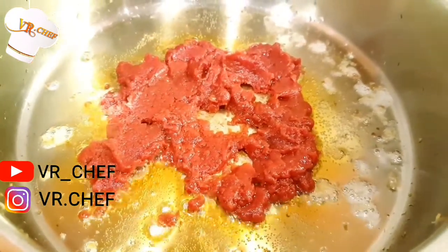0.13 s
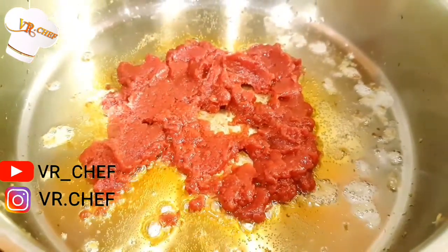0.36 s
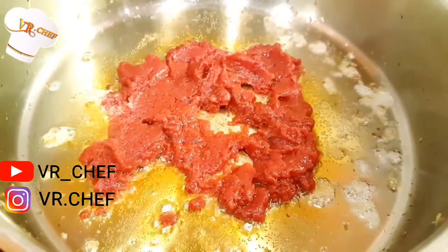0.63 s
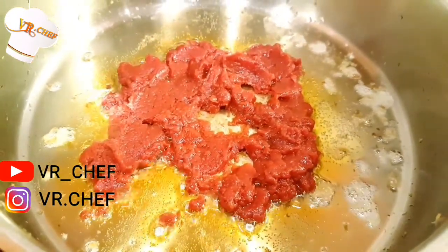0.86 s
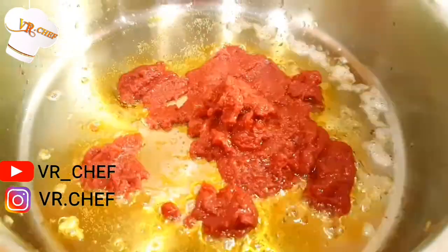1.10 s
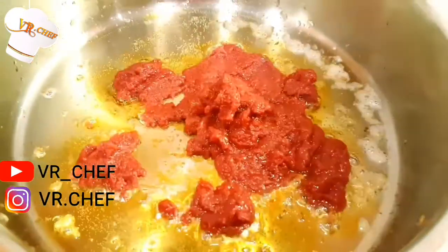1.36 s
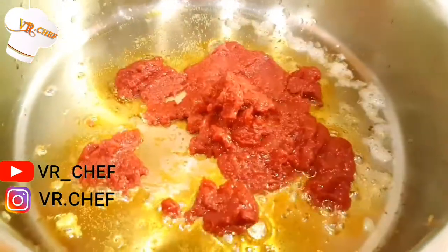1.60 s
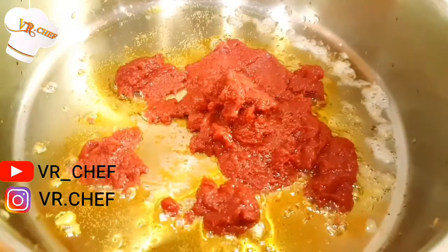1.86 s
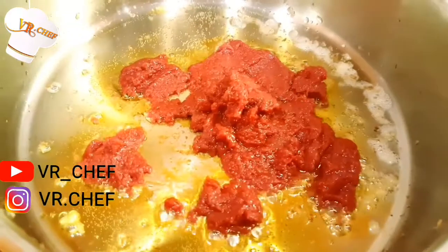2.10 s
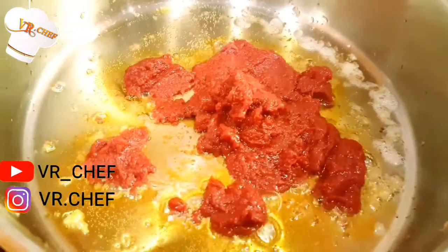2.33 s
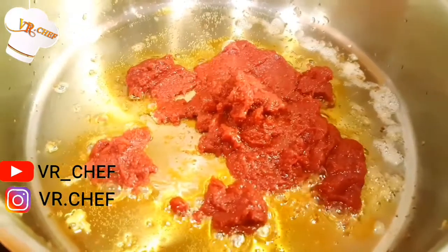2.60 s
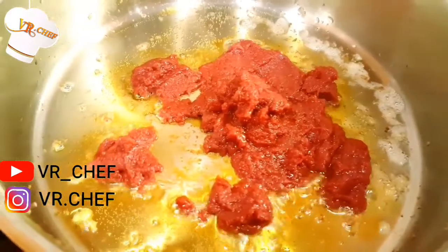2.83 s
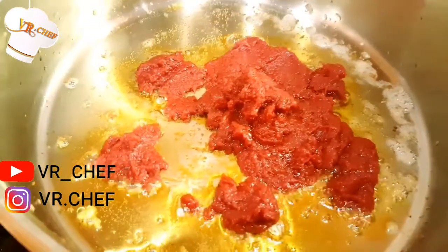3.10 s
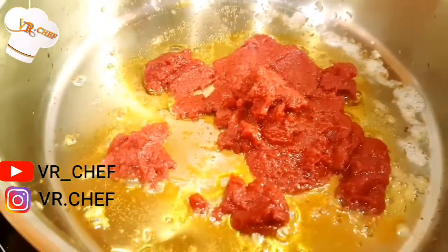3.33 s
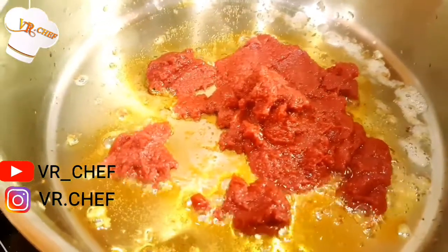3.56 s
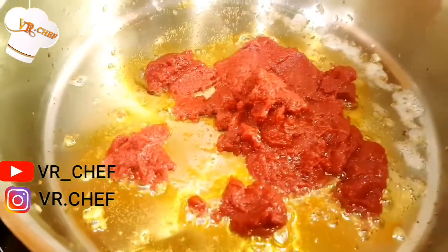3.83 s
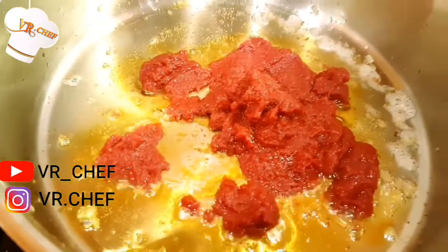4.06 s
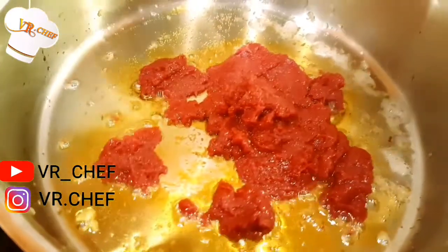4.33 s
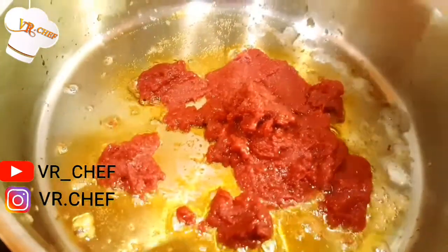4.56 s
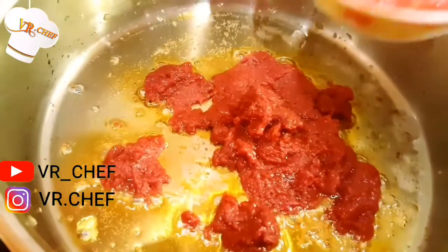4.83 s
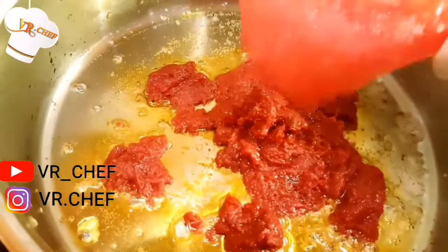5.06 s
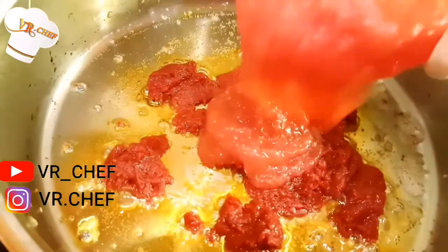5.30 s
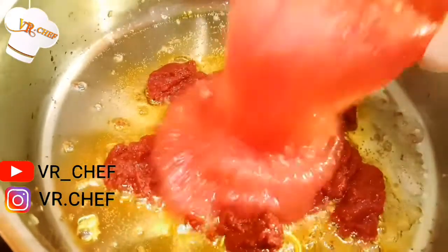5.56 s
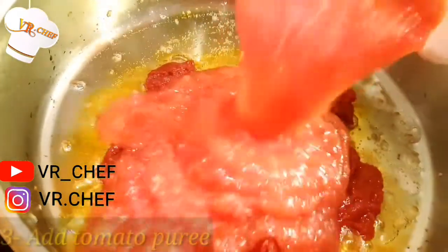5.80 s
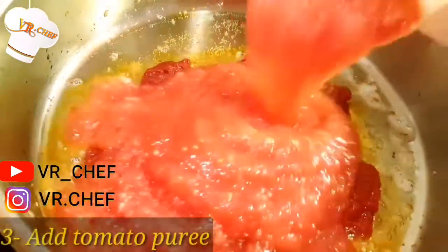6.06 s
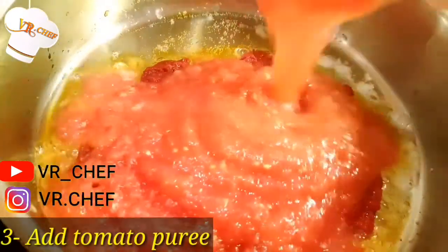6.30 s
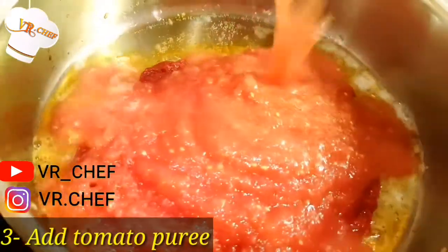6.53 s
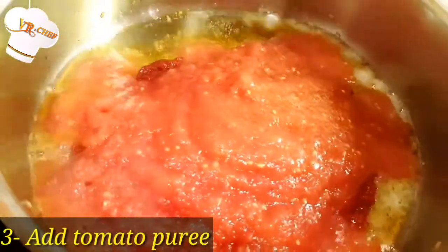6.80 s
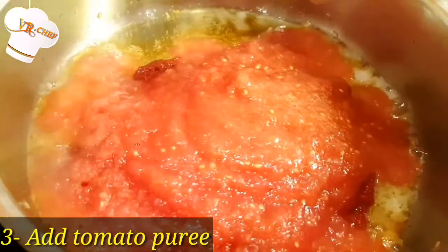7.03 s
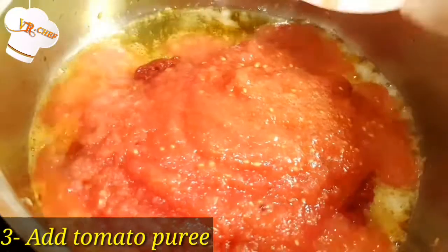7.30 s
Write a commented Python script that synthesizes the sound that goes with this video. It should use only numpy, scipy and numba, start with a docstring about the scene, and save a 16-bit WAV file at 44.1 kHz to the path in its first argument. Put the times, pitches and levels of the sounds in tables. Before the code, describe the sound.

Close to a steel pan in a kitchen, tomato paste fries in hot oil: sparse sharp pops and wet snaps, thickening gradually over faint fizz and a steady extractor fan rumble. A soft knock sounds twice early on. Then poured puree makes the sizzle surge quickly into a loud, dense, bubbling roar that slightly overloads the microphone and holds to the end.

```python
"""An extractor fan rumbles and rushes (shaped noise, wavering tones) under a fine fizz of tiny bubble bursts.
Tomato paste fries in hot oil in a steel pan, left of centre: steam bubbles pop as short, swelling sines.
Each burst echoes off the pan wall and rings the pan. A thin hum comes and goes; a soft knock sounds twice.
Poured puree then flashes to a roar of dense bubbles that overloads the input."""
import sys
import numpy as np
from scipy import signal
from scipy.fft import rfft, irfft, next_fast_len
from scipy.io import wavfile
from scipy.ndimage import uniform_filter1d
from numba import njit

SR = 44100
rng = np.random.default_rng(int(sys.argv[2]) if len(sys.argv) > 2 else 0)


def boost(x):
    """Linear amplitude factor 10**(x/20) for a level x in decibels (scalar or array-like)."""
    u = np.asarray(x, float) / 20
    return 10 ** u


def materialize(psi):
    """Save the field psi as 16-bit PCM at rate SR to the path in sys.argv[1].

    A 1-D psi becomes a single channel; in a 2-D psi each row is a channel.
    """
    bounded = np.clip(np.atleast_2d(psi).T, -1, 1)
    quanta = np.round(bounded * 32767).astype(np.int16)
    wavfile.write(sys.argv[1], SR, quanta)


N = 326781
TIME = np.arange(N) / SR


def level(x, rms_db):
    """Set the rms."""
    return x * boost(rms_db) / np.sqrt(np.mean(x ** 2))


def on_log(points, hz):
    """Read (Hz, value) points on a log-frequency axis."""
    point_hz, value = np.transpose(points)
    return np.interp(np.log(np.maximum(hz, 1)), np.log(point_hz), value)


def colour(x, gain):
    """Weigh the spectrum by gain(Hz)."""
    size = next_fast_len(N)
    hz = np.arange(size // 2 + 1) * SR / size
    return irfft(rfft(x, size) * gain(hz), size)[..., :N]


def walk(rate_hz):
    """Smoothed random steps, spread near 1."""
    k = int(SR / rate_hz)
    steps = np.repeat(rng.standard_normal(N // k + 1), k)
    return 1.266 * uniform_filter1d(uniform_filter1d(steps, k), k)[:N]


def tone(hz, rms_db, waver_hz, waver_db):
    """A sine whose pitch and level wander around hz and rms_db."""
    phase = 2 * np.pi * np.cumsum(hz + waver_hz * walk(18)) / SR
    return np.sqrt(2) * np.sin(phase) * boost(rms_db + waver_db * walk(7.4))


# spectrum of the air rush: pitch_hz, density_db [relative, per Hz]
FAN_SPECTRUM = [(15, -41), (25, -21.5), (71, -2), (164, -5), (189, -13), (288, -12), (345, -18),
                (430, -13.5), (569, -28), (668, -13.5), (738, -29), (950, -7), (1090, -1.5), (1250, -9),
                (1430, -19), (3000, -43), (3900, -55), (6600, -120)]
# likeness of the rush at the two ports: pitch_hz, likeness [0-1]
FAN_LIKENESS = [(60, 1), (130, 0.9), (290, 0.73), (640, 0.5), (1410, 0.59), (3100, 0.9), (6820, 0.03),
                (15000, 0.02)]
# motor tones: pitch_hz, level_db [rms, before wander], start_s
FAN_TONES = [(47, -59, 0), (82.6, -49, 0), (161, -57.5, 0.5), (436, -59, 2), (143, -51, 3), (215, -65, 2),
             (290, -56, 3.0)]


def fan():
    """Air rush as mid/side noise, alike at both ports in the bass, with wavering motor tones."""
    def likeness(hz):
        return np.clip(on_log(FAN_LIKENESS, hz), 0, 1)

    mid, side = rng.standard_normal((2, N))
    mid = colour(mid, lambda f: boost(on_log(FAN_SPECTRUM, f)) * np.sqrt(1 + likeness(f)))
    side = colour(side, lambda f: boost(on_log(FAN_SPECTRUM, f)) * np.sqrt(1 - likeness(f)))
    rush = level(np.array([mid + side, mid - side]), -39.5) * boost(2.0 * walk(3.86))
    tones = 0
    for pitch_hz, level_db, start_s in FAN_TONES:
        fade_in = np.clip((TIME - start_s) / 0.12, 0, 1)
        tones = tones + tone(pitch_hz, level_db, waver_hz=2.646, waver_db=2.5) * fade_in
    left_right_db = np.array([[1], [-1]])
    return rush + tones * boost(left_right_db)


@njit
def add(out, start, size, hz, cycles):
    """Sines that swell and die within a few cycles, one row of arrivals (samples) for each bubble."""
    for g in range(len(hz)):
        fade = hz[g] / cycles[g] / SR
        turn = np.exp(2j * np.pi * hz[g] / SR - fade)
        for a in range(start.shape[1]):
            # e * fade makes the envelope peak equal size
            i, z = int(start[g, a]), size[g, a] * np.e * fade + 0j
            for k in range(i, min(i + int(8 / fade) + 2, len(out))):
                out[k] += (k - i + 1) * z.imag
                z *= turn


# pan wall echoes: delay_ms, level_db [before dulling], scatter_ms
WALL = [(1.6, -5, .12), (3.3, -14, .4), (5.0, -20, .8)]


def bursts(start_s, level_db, hz, cycles, left_over_right_db, place, lag_samples=(3, 11)):
    """Bubbles at scattered places: left hears each first; every place has its own wall echoes."""
    direct = (0.000041, 0.013, 0.00017)
    delay_ms, path_db, scatter_ms = np.transpose([direct] + WALL)
    # every path, direct too, loses 7 dB per octave above 2 kHz
    path_db = path_db - 7 * np.log2(np.maximum(hz, 2000) / 2000)[:, None]
    sign = np.sign(place[:, 9:] - .5)
    min_lag, max_lag = lag_samples
    lag = min_lag + (max_lag - min_lag) * place[:, :1]
    out = np.zeros((2, N))
    for c in range(2):
        # the second port sees nearly the same paths as the first
        offset = 2 * place[:, 1:5] - 1 + c * 0.6 * (2 * place[:, 5:9] - 1)
        path_ms = delay_ms + scatter_ms * offset
        start = start_s[:, None] * SR + path_ms * SR / 1000 + c * lag
        size = boost(level_db[:, None] + path_db + (1.0 - c) * left_over_right_db[:, None]) * sign
        add(out[c], np.maximum(start, 0), size, np.minimum(hz, .45 * SR), cycles + 0 * hz)
    return out


def swarm(count, spread_db, low_hz, high_hz, cycles):
    """Random small bubbles, most faint, a few loud, their level capped."""
    u = rng.random((count, 14))
    level_db = spread_db * np.minimum(-np.log(1 - u[:, 1]), 4)
    hz = low_hz * (high_hz / low_hz) ** u[:, 2]
    left_over_right_db = 8 * (u[:, 3] - .5)
    return bursts(u[:, 0] * N / SR, level_db, hz, cycles, left_over_right_db, u[:, 4:])


def ring(x, hz, width_hz):
    """A resonance, gain 1 at its centre."""
    return signal.lfilter(*signal.iirpeak(hz, hz / width_hz, fs=SR), x)


# steel pan modes: pitch_hz, width_hz, level_db [relative]
PAN_MODES = [(290, 40, -14), (361, 45, -10), (645, 50, -6), (765, 55, -9), (920, 40, -9), (1305, 45, -4),
             (1880, 110, 4), (2210, 60, 2), (2760, 60, -3), (3340, 120, -4), (3830, 130, -6),
             (4370, 60, -7), (4790, 80, -9)]


def pan(x, ring_db, tail_db=-16, tail_t60_s=0.058):
    """The steel rings at its modes; hob and walls return a short diffuse tail, different at each port."""
    modes = sum(boost(level_db + ring_db) * ring(x, hz, width_hz) for hz, width_hz, level_db in PAN_MODES)
    t = np.arange(6000) / SR
    decay = np.exp(-np.log(1000) * t / tail_t60_s) * (t > .002)
    tail = rng.standard_normal((2, len(t))) * decay
    tail = level(tail, tail_db - 10 * np.log10(len(t)))  # tail_db: summed energy
    return x + modes + signal.fftconvolve(x, tail, axes=1)[:, :N]


# weighting of the boil: pitch_hz, gain_db
BOIL_SPECTRUM = [(88, -26), (150, -25), (361, -2.5), (490, -20.5), (628, -8.5), (837, -5.5), (1320, -3.5),
                 (1540, 0.5), (1870, -15.5), (2050, -4.5), (3370, -5.5), (10400, -23), (14400, -31)]
# weighting of the fizz: pitch_hz, gain_db
FIZZ_SPECTRUM = [(1500, -35), (4000, 1), (7000, 3), (10500, -1.5), (13000, 2.5), (16000, -5)]
# boil loudness over time, with a step up near 1.2 s: time_s, gain_db
BOIL_LEVEL = [(0, -49), (1.1, -50.5), (1.3, -47), (3.0, -49), (3.8, -45.5), (5.2, -47), (5.33, -37),
              (5.47, -35), (5.6, -29), (5.65, -29), (5.7, -24), (5.84, -20.5), (5.88, -16), (6.3, -15),
              (7.1, -13), (7.41, -14)]
# level difference of the ports: pitch_hz, left_over_right_db
PORTS = [(60, -18), (110, 32), (200, -3), (380, 4), (700, 1.5), (1290, 3), (2380, 6.5), (4400, 7),
         (8120, 0.5), (15000, 0)]
FIZZ_GAIN_DB, FIZZ_DB_PER_S = -45.5, 0.66  # calm fizz, growing as the oil heats
# puree spreads over bare hot steel
FLASH_S, FLASH_ATTACK_S, FLASH_GAIN_DB, FLASH_DB_PER_S = 5.83, 0.063, -23.5, 5.5
PLOPS_RISE_S = 6.4
CRACKLE_DB_PER_S = 1.16  # grows as the oil heats


def frying():
    """Dense boil swells by its table, finer fizz flares at the flash; sparse crackle marks the calm."""
    boil = swarm(count=60000, spread_db=3.0, low_hz=8600, high_hz=15300, cycles=0.065)
    boil = colour(boil, lambda f: boost(on_log(BOIL_SPECTRUM, f)))
    # larger bubbles in the wet puree ring for several cycles
    plops = swarm(count=9000, spread_db=6.5, low_hz=1135, high_hz=4620, cycles=3.4)
    wet_share = np.clip((TIME - PLOPS_RISE_S) / .1, .12, 1)
    boil = level(boil, 0) + wet_share * level(plops, -9.5)
    boil = level(pan(boil, ring_db=7.0, tail_db=-10.5), 6.34)
    boil = boil * boost(np.interp(TIME, *np.transpose(BOIL_LEVEL))) * boost(.8 * walk(18))

    fizz = swarm(count=60000, spread_db=2.0, low_hz=8450, high_hz=14300, cycles=0.043)
    fizz = colour(fizz, lambda f: boost(on_log(FIZZ_SPECTRUM, f)))
    since_s = TIME - FLASH_S
    attack = np.clip(since_s / FLASH_ATTACK_S, 0, 1)
    calm_gain = boost(FIZZ_GAIN_DB + FIZZ_DB_PER_S * TIME)
    fizz_gain = calm_gain + attack * boost(FLASH_GAIN_DB + FLASH_DB_PER_S * since_s)
    fizz = level(fizz, 3) * fizz_gain * boost(.4 * walk(30))

    crackle = swarm(count=700, spread_db=2.5, low_hz=2600, high_hz=12000, cycles=0.4)
    crackle = level(pan(crackle, ring_db=-22), -50) * boost(CRACKLE_DB_PER_S * TIME)
    return colour(boil + fizz + crackle, lambda f: boost(np.outer([.5, -.5], on_log(PORTS, f))))


# big bursts: start_s, level_db [relative], radius_mm [main bubble], spit_db [relative], left_over_right_db
POPS = [(0.0944, -22, 1.12, -48, 10), (0.824, -20.5, 1.7, -44, 10.5), (0.9186, -26.5, 0.85, -44, 10),
        (1.1002, -23.5, 0.76, -43, 10), (1.234, -22, 2, -46, 8), (1.354, -17, 1.75, -33.5, 9),
        (1.43, -30.5, 0.72, -30, 12), (1.4365, -19.5, 0.85, -41, 10), (1.4603, -22.5, 1.2, -45, 8),
        (1.594, -35, .7, -23, 8), (1.6494, -27, 0.58, -22, 12), (1.8613, -30, 0.85, -24.5, 10),
        (1.88, -22, 2.1, -38, 8.5), (1.892, -28.5, .9, -53, 13), (2.012, -27.5, 1.2, -29, 11),
        (2.088, -40, .8, -36, 4), (2.132, -42, 0.74, -29, 4), (2.204, -13.5, 1.3, -17.5, 4),
        (2.229, -20.5, 0.94, -31, 6), (2.268, -24, 0.61, -21, 7), (2.3166, -28, 0.86, -45, 8),
        (2.336, -14.5, 2.5, -49, 7), (2.3918, -21, 0.82, -42, 16), (2.4347, -27.5, 0.97, -25, 9),
        (2.462, -15.5, 1.26, -53, 14), (2.5023, -14.5, 1.14, -30, 9), (2.6155, -17.5, 0.47, -24, 10),
        (2.733, -37, .6, -31, 5), (2.792, -24.5, 1.5, -40, 5), (2.8062, -19.5, 2.16, -38, 5),
        (2.8259, -19, 0.7, -33, 10), (2.876, -18, 0.72, -18, 6), (2.9583, -30.5, 0.85, -43, 7),
        (3.0948, -28, 0.38, -35, 2), (3.1318, -17.5, 1.77, -34, 9), (3.149, -26.5, 1, -18, 2),
        (3.1684, -14.5, 2.32, -26, 5), (3.3161, -14, 0.74, -38, 12), (3.3462, -13.5, 1.1, -13, 5),
        (3.5228, -24, 2.17, -41, 9), (3.5458, -26, 0.99, -38, 10), (3.6464, -24.5, 1.15, -30, 12),
        (3.6705, -23.5, 0.85, -21, 10), (3.7383, -13.5, 1.32, -32, 7), (3.8694, -21.5, 1.08, -12.5, 6),
        (3.924, -25, 0.33, -22, 3), (3.9614, -27, 0.69, -42, 10), (3.9922, -24.5, 0.74, -34, 11),
        (4.0036, -25, 1.3, -50, 17), (4.0264, -26.5, 0.7, -49, 16), (4.1005, -23, 1.5, -50, 17),
        (4.2095, -30, 0.79, -29, 5), (4.279, -20.5, 0.91, -50, 7.5), (4.3012, -22.5, 0.85, -38, 10),
        (4.3922, -14, 2, -34, 10.5), (4.481, -29, .85, -26, 9), (4.6986, -13, 1.22, -24, 9),
        (4.86, -21, 0.63, -13.5, 7), (4.901, -26, 1.05, -29, 4), (4.9443, -18.5, 2.0, -43, 7),
        (5.086, -23.5, 2, -37, 6), (5.1548, -18.5, .7, -19, 11), (5.2144, -42, .65, -22, 2),
        (5.2963, -20, 1.05, -11.5, 4), (5.3105, -12, 1.02, -15, 6), (5.375, -29, 0.65, -27, 1),
        (5.4218, -18.5, .8, -10.5, -1), (5.4439, -10.5, 0.83, -15, 3), (5.483, -18, 1.93, -35, 13),
        (5.546, -22, 1.07, -31, 9), (5.5777, -15.5, .8, -13, 9), (5.5944, -15, 0.85, -15, 3),
        (5.6604, -11, 0.52, -12, 7)]
# bubble sizes in a burst, the last is the spit: pitch_hz, cycles [fade time], peak_over_rms_db
SIZES = [(960, 0.55, -4.5), (2590, 0.36, 6), (4410, 0.45, 18), (7040, 0.76, 20), (10650, 0.37, 23)]
MINNAERT_HZ_MM = 3280  # a bubble of radius r mm rings at this over r
FALL_DB = 19.5  # loss per squared octave from the main size
SCATTER_DB, SCATTER_T60_S, SCATTER_SPAN_S = -3, 0.064, 0.014  # against the burst, fade, spread in time
SCATTER_DULL_DB = -5  # per octave above 2.5 kHz


def pops(reflections=12):
    """Sizes near the main bubble ring loudest, a little off pitch; a dense, fading tail of reflections follows."""
    start_s, main_db, radius_mm, spit_db, left_over_right_db = np.transpose(POPS)
    size_hz = np.array(SIZES)[:-1, :1]
    octaves_sq = np.log2(size_hz * np.maximum(radius_mm, .2) / MINNAERT_HZ_MM) ** 2
    sizes_db = [*(main_db - FALL_DB * (octaves_sq - octaves_sq.min(axis=0))), spit_db]
    u = rng.random((len(start_s), 14))
    detune = 1 + .3 * (u - .5)
    out = 0
    for k, (level_db, (hz, cycles, peak_db)) in enumerate(zip(sizes_db, SIZES)):
        level_db = level_db + peak_db - left_over_right_db / 2
        out = out + bursts(start_s, level_db, hz * detune[:, k], cycles, left_over_right_db, u[:, 4:],
                           lag_samples=(3, 10))
        v = rng.random((len(start_s) * reflections, 12))
        late_s = 0.0014 + SCATTER_SPAN_S * v[:, 0] ** 1.5
        dull_db = SCATTER_DULL_DB * max(np.log2(hz / 2500), 0)
        fade_db = -60 * late_s / SCATTER_T60_S
        reflection_db = np.repeat(level_db, reflections) + SCATTER_DB + dull_db + fade_db
        reflection_hz = hz * (0.69 + .5 * v[:, 1])
        # scattered reflections sit nearer the middle
        reflection_pan_db = .5 * np.repeat(left_over_right_db, reflections)
        out = out + bursts(np.repeat(start_s, reflections) + late_s, reflection_db, reflection_hz, cycles,
                           reflection_pan_db, v[:, 2:])
    return out


# times the hum sounds: on_s, off_s [middles of the ramps]
HUM_SPANS = [(0.6, 1.64), (1.8, 2)]


def hum(ramp_s=0.15):
    """A thin, slightly wavering sine that comes and goes."""
    on = sum(np.clip(np.minimum(TIME - a, b - TIME) / ramp_s + .5, 0, 1) for a, b in HUM_SPANS)
    return tone(658, -53, waver_hz=2.5, waver_db=1.0) * on


# blows: start_s, level_db [relative]
KNOCKS = [(0.928, -34), (1.074, -15.5)]
# worktop modes: pitch_hz, level_db [relative], t60_s
KNOCK_MODES = [(110, -8, 0.13), (172, 4, 0.081), (290, 3.5, 0.062), (345, -6.5, 0.21), (536, -4, 0.035)]


def knocks():
    """A soft blow on the worktop: a slow push, so only low modes ring."""
    out = np.zeros(N)
    for start_s, blow_db in KNOCKS:
        t = np.maximum(TIME - start_s, 0)
        push = np.tanh(t / 0.0015)
        for hz, mode_db, t60_s in KNOCK_MODES:
            decay = np.exp(-np.log(1000) * t / t60_s)
            out += boost(blow_db + mode_db - 6) * np.sin(2 * np.pi * hz * t) * decay * push
    return out


def scene():
    """Everything at the two ports; small bubbles carry no bass."""
    pan_sound = frying() + pan(pops(), ring_db=-22, tail_db=-19.5, tail_t60_s=0.13)
    high_pass = signal.butter(2, 130, "high", fs=SR, output="sos")
    return signal.sosfilt(high_pass, pan_sound) + fan() + hum() + knocks()


def roll_off(x):
    """The treble ends steeply here."""
    return signal.sosfilt(signal.butter(12, 15600, fs=SR, output="sos"), x)


def record(dry):
    """The input rounds the roar softly, then a steep low-pass cuts the top."""
    x = .8 * np.tanh(dry / .8)
    low_pass = signal.ellip(10, .2, 70, 14550, fs=SR, output="sos")
    x = signal.sosfilt(low_pass, x)
    return roll_off(np.clip(x, -1, 1))


dry = scene()
out = record(dry)
materialize(out)
```